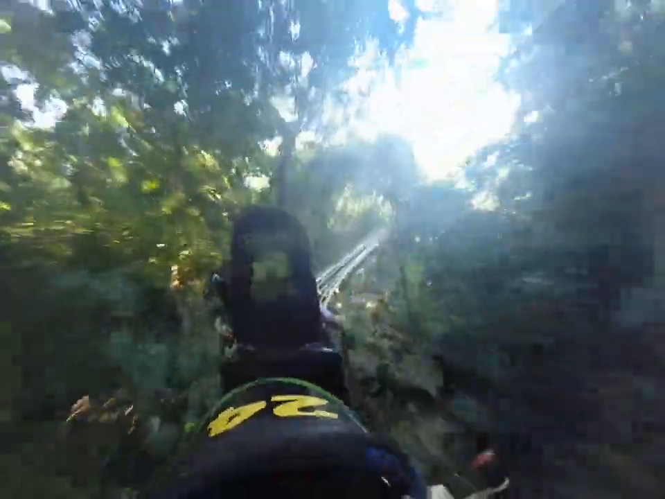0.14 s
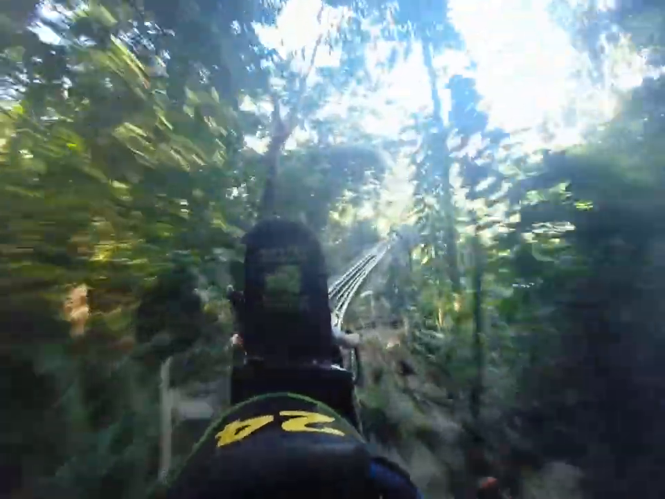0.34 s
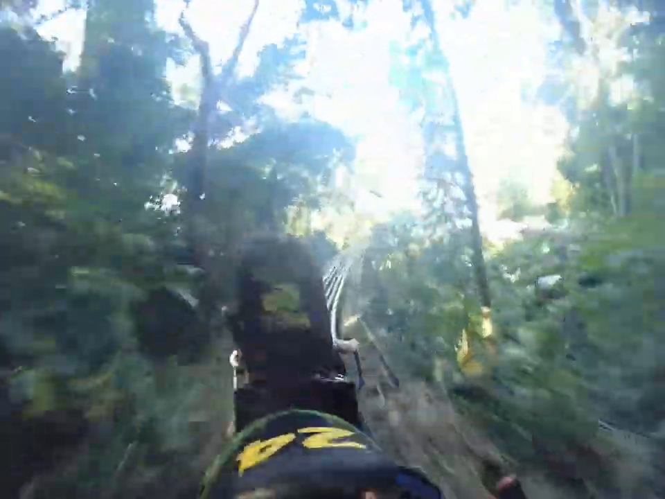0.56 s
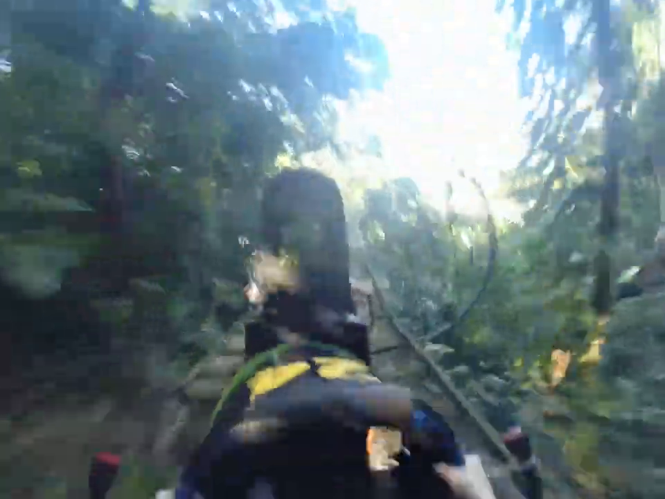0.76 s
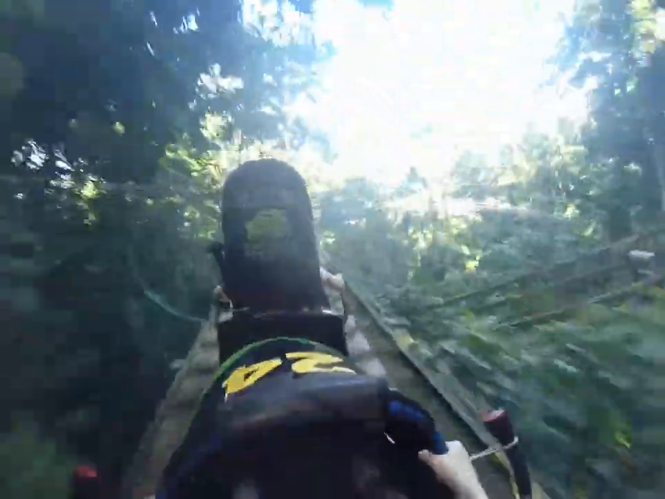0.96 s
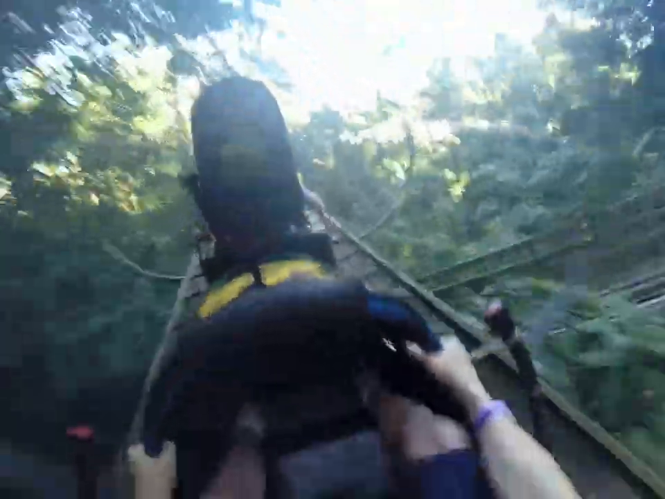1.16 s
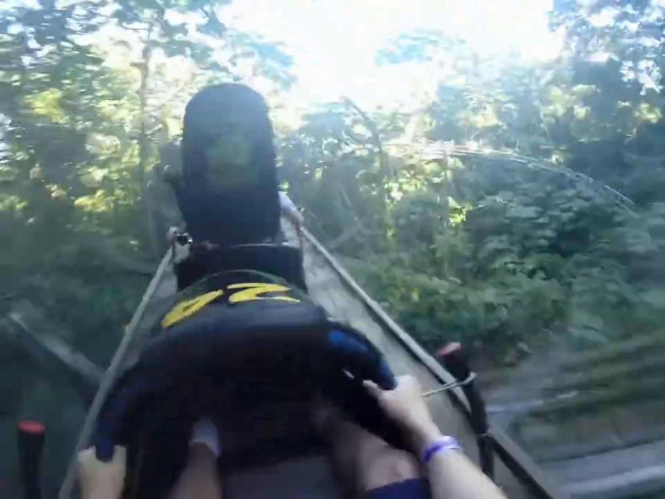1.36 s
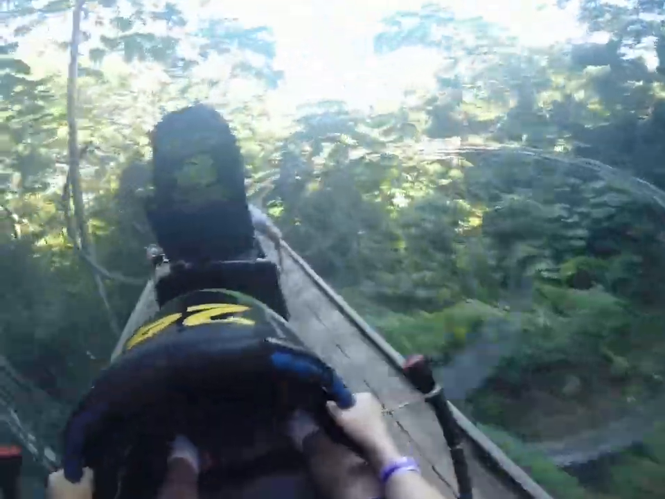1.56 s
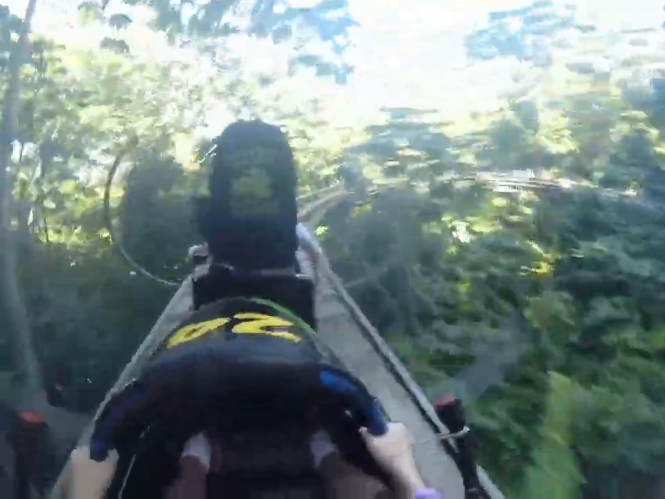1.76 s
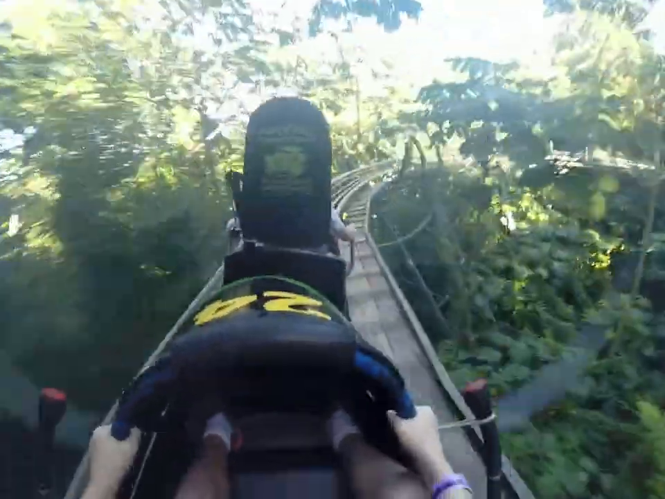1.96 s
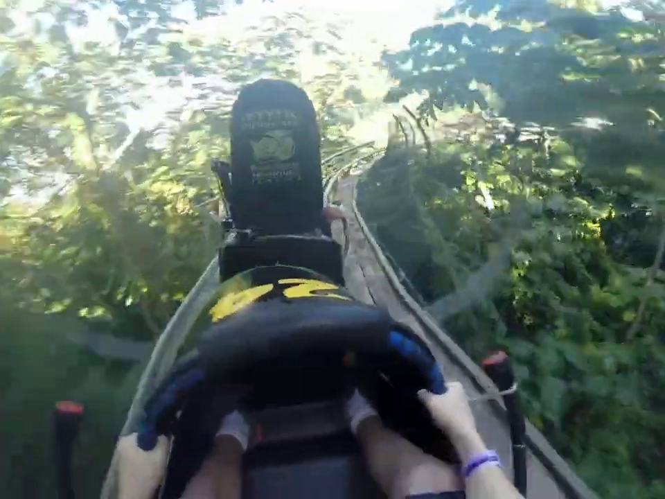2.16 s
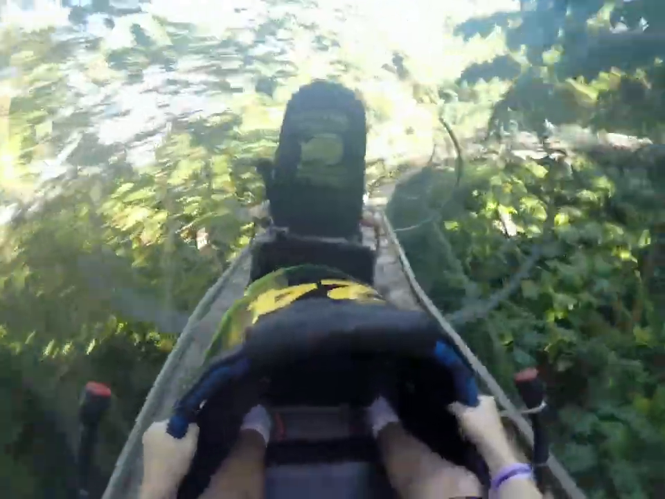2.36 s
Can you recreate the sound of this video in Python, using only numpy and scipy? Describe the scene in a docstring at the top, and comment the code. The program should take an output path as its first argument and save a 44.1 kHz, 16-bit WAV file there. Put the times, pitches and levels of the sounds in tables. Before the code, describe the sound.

A ride car runs fast down steel rails, heard close through a small camera's closed housing. A very deep, uneven shudder dominates, with heavy bounces near 0.2, 0.8 and 1.3 seconds and a weaker one at 2.2. Soft gritty wheel roar and quiet hiss continue beneath. Short dry rattles scatter throughout, sharpest near 1.57. A faint thin squeak comes around 0.45; soft bright puffs follow after 1.65.

```python
"""A deep, uneven shudder throughout, with heavy bounces of the frame: a ride car rolls fast down steel rails.
The microphone is on board, in a small camera's closed housing: sine waves and noise shake the frame.
Wheels roar softly as gritty noise; loose parts at rail joints are clicks ringing the housing's modes.
A rubbing wheel squeaks in wobbling tones, and puffs of bright noise swish over a quiet, steady hiss."""
import sys
import numpy as np
from scipy import signal
from scipy.fft import rfft, irfft
from scipy.io import wavfile
from scipy.ndimage import uniform_filter1d

SR = 44100
rng = np.random.default_rng(int(sys.argv[2]) if len(sys.argv) > 2 else 0)


def transcribe(signal):
    """Save signal, clipped to [-1, 1], as a 16-bit WAV file at the path in sys.argv[1]."""
    frames = np.atleast_2d(signal).T
    limited = np.clip(frames, -1, 1)
    pcm = np.round(limited * 32767).astype(np.int16)
    wavfile.write(sys.argv[1], SR, pcm)


N = 106236  # samples, about 2.4 s

# shaking of the car under the microphone: t/s, shudder level/dB, drumming level/dB, rumble level/dB
FRAME_SHAKE = [(0.05, -18.5, -22, -37), (0.1, -29.5, -28, -43.5), (0.19, -9, -22, -30.5),
               (0.285, -25, -29, -32), (0.4, -23.5, -37.5, -41), (0.5, -19.5, -27.5, -27.5),
               (0.56, -17, -28, -38), (0.65, -35.5, -35.5, -37), (0.78, -18.5, -24, -31.5),
               (0.82, -18, -26, -55), (0.88, -26.5, -25, -29.5), (0.93, -26, -24, -53),
               (1.16, -19.5, -25.5, -32.5), (1.21, -19.5, -40, -39), (1.3, -16.5, -19, -34),
               (1.36, -12, -36, -35.5), (1.46, -20.5, -38, -40.5), (1.5, -15.5, -25.5, -58),
               (1.56, -34.5, -31, -34.5), (1.66, -17.5, -25.5, -30), (1.76, -23, -39, -47),
               (1.85, -25, -22.5, -33.5), (1.88, -22.5, -43, -39.5), (1.999, -25, -23.5, -30),
               (2.11, -28, -32, -43.5), (2.17, -19, -26.5, -40), (2.36, -23, -37, -37)]
# the same shaking at t = 0: t/s, shudder level/dB, drumming level/dB, rumble level/dB
FRAME_SHAKE_AT_START = [(0, -20, -24, -35)]
# wide rumble of the frame, spectrum shape: f/Hz, relative density level/dB
RUMBLE_SPECTRUM = [(60, 5), (80, -6), (100, -9), (130, -11), (170, -19), (240, -18.5)]
# heavy bounces of the frame: t/s of the trough, peak level/dB, f/Hz
FRAME_BOUNCES = [(.22, -4, 26.7), (.758, -11, 41.8), (0.795, -11, 40.3), (1.285, -5, 25.5),
                 (1.372, -12.5, 34.5), (2.223, -13, 28.8)]
BOUNCE_RISE_CYCLES, BOUNCE_FALL_CYCLES = 0.677, 0.85  # Gaussian reach before and after the trough
SHUDDER_HZ, SHUDDER_WIDTH_HZ, SHUDDER_WANDER = 26.9, 14.1, 0.2116  # wander: spread as a share of f
DRUM_HZ, DRUM_WIDTH_HZ, DRUM_WANDER = 47, 20.3, 0.2


def frame():
    """Two frame modes kept ringing over wide rumble; a heavy bounce takes over the modes while it lasts."""
    t = np.arange(N) / SR
    shake = FRAME_SHAKE_AT_START + FRAME_SHAKE
    deep = shudder(SHUDDER_HZ, SHUDDER_WIDTH_HZ, SHUDDER_WANDER, rough=0.62) * curve(shake, axis=1)
    drum = shudder(DRUM_HZ, DRUM_WIDTH_HZ, DRUM_WANDER, rough=1.01) * curve(shake, axis=2)
    rumble = coloured(RUMBLE_SPECTRUM, flicker_db=0.42) * curve(shake, axis=3)
    calm, bounce = 1, 0
    for at, db, hz in FRAME_BOUNCES:
        since = t - at
        reach_cycles = np.where(since < 0, BOUNCE_RISE_CYCLES, BOUNCE_FALL_CYCLES)
        env = np.exp(-(since * hz / reach_cycles) ** 2)
        calm = calm * (1 - np.sqrt(env))
        bounce = bounce - undb(db) * env * np.cos(2 * np.pi * hz * since)
    return (deep + drum) * calm + bounce + rumble


def shudder(hz, width_hz, wander, rough):
    """A frame mode kept ringing: a wandering tone blurred by noise."""
    wandering_hz = hz * (1 + wander * walk(22))
    tone = np.sqrt(2) * np.sin(2 * np.pi * np.cumsum(wandering_hz) / SR)
    blur = band(band(rng.standard_normal(N), hz, width_hz), hz, 2 * width_hz)
    return unit(tone + rough * unit(blur))


# modes of the closed housing round the microphone: f/Hz, relative level/dB, decay by 60 dB t/s
HOUSING_MODES = [(1502, -0.5, 0.016), (1806, 4, 0.012), (2233, -3, 0.022), (2540, 1, 0.0065),
                 (2824, -2.5, 0.016), (3060, -4.5, 0.014), (3673, -4, 0.014), (4184, 9.5, 0.0066),
                 (4760, 1, 0.021), (5310, 2, 0.0094), (5984, -3, 0.03), (6810, -0.5, 0.013),
                 (7920, -5.5, 0.012), (9300, -3.5, 0.0034)]
# rattles on the car: start t/s, peak level/dB, centre f/Hz, width f/Hz,
# treble level/dB against the peak, low knock peak level/dB, length t/s
RATTLE_EVENTS = [(0.064, -46.5, 1500, 496, 6.5, -49, 0.006), (0.113, -39, 2300, 2500, -7.5, -35.5, 0.0053),
                 (0.131, -38, 1880, 1990, -25, -62, 0.018), (0.171, -34, 2330, 1200, -17, -55, 0.0091),
                 (0.257, -29.5, 3400, 1230, -6.5, -55, 0.0062), (0.268, -37, 2380, 2500, 1, -37, 0.019),
                 (.461, -35.5, 2700, 600, -25, -60, 0.0046), (0.47, -33.5, 2020, 1790, -18, -42, 0.028),
                 (0.52, -34, 2190, 2000, -22, -39, 0.0039), (0.56, -35.5, 2180, 500, -24, -49, 0.0063),
                 (0.58, -39, 1480, 400, -20, -61, 0.011), (0.625, -36, 2320, 1200, -22, -43.5, 0.011),
                 (0.651, -40.5, 1900, 2000, -24, -48, 0.016), (0.732, -35, 2380, 2200, -15, -36, 0.0078),
                 (.833, -32.5, 2000, 1400, -29, -36.5, 0.0044), (0.848, -32.5, 1910, 2000, -18, -63, 0.015),
                 (0.971, -30.5, 1890, 2560, -20, -35.5, 0.009), (1.01, -44.5, 2820, 400, -25, -62, 0.011),
                 (1.09, -34.5, 2560, 900, -13, -41, 0.0077), (1.105, -36.5, 2140, 1500, -22, -36, 0.023),
                 (1.143, -31, 2760, 1500, -15, -69, 0.0018), (1.157, -48.5, 3000, 2000, 12.5, -50, .003),
                 (1.278, -35.5, 2180, 2400, 1, -30.5, 0.0066), (1.35, -27.5, 2500, 1500, -12.5, -55, 0.013),
                 (1.381, -51, 3300, 1500, 11, -58, 0.012), (1.455, -38, 2450, 900, -23, -46, 0.019),
                 (1.554, -31, 2800, 1800, -19, -48, 0.013), (1.571, -20.5, 2800, 2040, -14.5, -53, 0.0089),
                 (1.585, -28, 2680, 1500, -15, -65, 0.0089), (1.596, -30, 1870, 1500, -30, -49, 0.01),
                 (1.656, -41, 2900, 2000, -8, -47, 0.044), (1.803, -43.5, 2880, 700, -3, -62, 0.018),
                 (1.86, -34.5, 2750, 605, -26, -55, 0.0037), (1.877, -39, 2820, 500, -25, -57, 0.0044),
                 (1.901, -41, 1690, 1200, -3, -60, 0.0069), (2.007, -35.5, 2610, 1000, -14, -55, 0.0075),
                 (2.02, -33, 1920, 1200, -10, -36.5, 0.018), (2.195, -40, 1740, 1500, -22, -38, 0.0088),
                 (2.25, -49, 2600, 1210, -19, -60.5, 0.012)]
RATTLE_CLICKS_PER_S, RATTLE_SCATTER_DB = 3200, 4.5
RATTLE_RISE_S, RATTLE_TAIL = 0.005, 0.74  # tail: decay time as a share of the length
KNOCK_HZ, KNOCK_WIDTH_HZ = 510, 293
TREBLE_FROM_HZ, CONTACT_HZ = 3800, 9000  # split of the modes; low-pass corner of a soft contact
SMALL_PER_S, SMALL_DB, SMALL_SCATTER_DB = 80, -57, 1.5  # small clicks throughout


def rattles():
    """Each rattle is a dense volley of clicks that rings the housing, with a dull knock under it."""
    out, size = np.zeros(N + SR), SR // 5
    t = np.arange(size) / SR
    mids = [mode for mode in HOUSING_MODES if mode[0] < TREBLE_FROM_HZ]
    highs = [mode for mode in HOUSING_MODES if mode[0] >= TREBLE_FROM_HZ]
    soft = signal.butter(2, CONTACT_HZ, fs=SR, output="sos")
    for at, db, hz, width_hz, treble_db, knock_db, length in RATTLE_EVENTS:
        length = max(length, .002)
        decay = np.exp(-np.maximum(t - length, 0) / (RATTLE_TAIL * length))
        env = decay * np.minimum(t / RATTLE_RISE_S, 1)
        chance, side = rng.random((size, 2)).T
        clicks = (chance < RATTLE_CLICKS_PER_S / SR) * np.sign(side - .5) * env
        clicks = clicks * undb(RATTLE_SCATTER_DB * rng.standard_normal(size))
        clicks[int(RATTLE_RISE_S * SR)] = 1  # one sure click at the end of the rise
        clicks = signal.sosfilt(soft, clicks)
        body = peak_one(band(band(ring(clicks, mids), hz, width_hz), hz, 2 * width_hz))
        treble = undb(treble_db) * peak_one(ring(clicks, highs))
        thud = env * rng.standard_normal(size)
        knock = peak_one(band(band(thud, KNOCK_HZ, KNOCK_WIDTH_HZ), KNOCK_HZ, KNOCK_WIDTH_HZ))
        i = int(at * SR)
        out[i:i + size] += undb(db) * (body + treble) + undb(knock_db) * knock
    small_levels = undb(SMALL_DB + SMALL_SCATTER_DB * rng.standard_normal(N))
    small = (rng.random(N) < SMALL_PER_S / SR) * small_levels
    return out[:N] + ring(signal.sosfilt(soft, small), HOUSING_MODES)


# roar of the wheels below the microphone: t/s, low roar level/dB, mid roar level/dB
WHEEL_ROLL = [(0.08, -45.5, -50), (0.16, -41.5, -48), (0.26, -48, -54.5), (0.29, -37, -44.5),
              (0.31, -46.5, -58.5), (0.38, -51.5, -56.5), (0.47, -43.5, -47.5), (0.64, -44, -50),
              (0.65, -43, -48.5), (0.99, -43.5, -52), (1.04, -49.5, -54.5), (1.18, -39.5, -49),
              (1.23, -49.5, -52.5), (1.285, -40.5, -46.5), (1.44, -48, -52), (1.56, -42.5, -50.5),
              (1.61, -38, -47.5), (1.77, -49, -55), (1.85, -42, -48.5), (2.04, -42, -49.5),
              (2.36, -46.5, -50.5)]
# the same roar at t = 0: t/s, low roar level/dB, mid roar level/dB
WHEEL_ROLL_AT_START = [(0, -44, -50)]
# spectrum shapes of the low roar, the mid roar and the hiss: f/Hz, relative density level/dB
LOW_ROAR_SPECTRUM = [(76, -55), (130, -1.5), (422, -11.5), (507, -11), (550, -16.5), (591, -13.5),
                     (1290, -22.5), (1500, -20), (1950, -23.5), (3300, -120)]
MID_ROAR_SPECTRUM = [(600, -5.5), (900, -3.5), (1340, -0.5), (1770, -5), (2240, 1), (2800, -3),
                     (3330, -8.5), (3800, -14.5)]
HISS_SPECTRUM = [(3000, -16), (3700, -8), (4200, 0), (4500, -2), (4760, -1), (5000, -8), (5700, -7),
                 (6800, -10), (7700, -18), (9500, -18), (12700, -24), (15000, -37)]
HISS_DB, ROAR_FLICKER_DB = -57, 1
GRAIN_DB, GRAIN_PER_S = 2.5, 100  # fast level grit of the roar


def wheels():
    """Gritty low and mid roar of wheels on steel over a steady hiss."""
    roll = WHEEL_ROLL_AT_START + WHEEL_ROLL
    low = coloured(LOW_ROAR_SPECTRUM, ROAR_FLICKER_DB) * curve(roll, axis=1)
    mid = coloured(MID_ROAR_SPECTRUM, ROAR_FLICKER_DB) * curve(roll, axis=2)
    grit = undb(GRAIN_DB * walk(GRAIN_PER_S))
    hiss = coloured(HISS_SPECTRUM, flicker_db=1.1) * undb(HISS_DB)
    return (low + mid) * grit + hiss


# puffs of treble at the microphone: t/s of the middle, length t/s, level/dB
SWISH_EVENTS = [(0.605, 0.044, -60), (1.672, 0.043, -54), (1.983, 0.06, -51), (2.122, 0.058, -48),
                (2.312, 0.05, -51)]
# spectrum shape of a puff: f/Hz, relative density level/dB
SWISH_SPECTRUM = [(3000, -12), (4500, 0), (5200, -8), (6800, -5), (8000, -17), (10000, -16), (14500, -30)]


def swishes():
    """Soft bright puffs: coloured noise under Gaussian swells."""
    t, swell = np.arange(N) / SR, 0
    for at, length, db in SWISH_EVENTS:
        swell = swell + undb(db) * np.exp(-(2 * (t - at) / length) ** 2)
    return coloured(SWISH_SPECTRUM, flicker_db=0.91) * swell


# squeaks of a wheel: start t/s, length t/s, start f/Hz, end f/Hz, level/dB at the middle
SQUEAK_EVENTS = [(0.438, 0.068, 5500, 6000, -56.5), (0.51, 0.051, 6150, 6050, -66),
                 (0.35, .047, 5550, 5200, -69)]
SQUEAK_WOBBLE, SQUEAK_ROUGH_DB = .016, 4  # spread of pitch as a share of f, spread of level


def squeaks():
    """Thin gliding tones of a rubbing wheel, wobbling in pitch and level."""
    t, out = np.arange(N) / SR, 0
    for at, length, start_hz, end_hz, db in SQUEAK_EVENTS:
        progress = np.clip((t - at) / length, 0, 1)
        hz = (start_hz + (end_hz - start_hz) * progress) * (1 + SQUEAK_WOBBLE * walk(400))
        level = undb(db + SQUEAK_ROUGH_DB * walk(201))
        arch = np.sqrt(2 * np.sin(np.pi * progress))
        out = out + level * arch * np.sin(2 * np.pi * np.cumsum(hz) / SR)
    return out


def undb(db):
    """Amplitude factor of a level in dB."""
    return 10 ** (np.asarray(db) / 20)


def unit(x):
    """Scale to an RMS of 1."""
    return x / np.sqrt(np.mean(x ** 2))


def peak_one(x):
    """Scale to a peak of 1."""
    return x / np.abs(x).max()


def curve(table, axis):
    """Gain over time from one dB column."""
    rows = np.array(table)
    return undb(np.interp(np.arange(N) / SR, rows[:, 0], rows[:, axis]))


def walk(rate):
    """Random levels held 1 / rate s and slewed twice; spread 1."""
    hold = int(SR / rate)
    steps = np.repeat(rng.standard_normal(N // hold + 1), hold)
    slewed = uniform_filter1d(uniform_filter1d(steps, hold), hold)[:N]
    return slewed / slewed.std()


FLICKER_PER_S = 20


def coloured(table, flicker_db):
    """Noise of RMS 1 with the given spectrum; each band of about half an octave flickers alone."""
    hz, db = np.array(table, float).T
    f = np.arange(N // 2 + 1) * SR / N + 1e-3  # the offset keeps log(f) finite
    spec = rfft(rng.standard_normal(N)) * undb(np.interp(np.log(f), np.log(hz), db))
    edges = np.geomspace(hz[0], hz[-1], num=int(2 * np.log2(hz[-1] / hz[0])) + 2)
    out = np.zeros(N)
    for low, high in zip(edges[:-1], edges[1:]):
        part = irfft(spec * ((f >= low) & (f < high)), N)
        out += part * undb(flicker_db * walk(FLICKER_PER_S))
    return unit(out)


def band(x, hz, width_hz):
    """Resonant band-pass, gain 1 at the centre."""
    return signal.lfilter(*signal.iirpeak(hz, hz / width_hz, fs=SR), x)


def ring(x, modes):
    """Modes of a struck body: decaying sines, with alternating signs."""
    out = np.zeros(len(x))
    for k, (hz, db, t60) in enumerate(modes):
        decay = np.log(1000) / (max(t60, 1e-3) * SR)
        pole = np.exp(2j * np.pi * hz / SR - decay)
        out += (-1) ** k * undb(db) * signal.lfilter([1], [1, -pole], x).imag
    return out


def scene():
    """All sources on the car summed to one channel."""
    return (frame() + rattles() + wheels() + swishes() + squeaks())[None, :]


TOP_HZ = 15200


def record(dry):
    """The camera cuts the top with a steep low-pass."""
    return signal.sosfilt(signal.ellip(8, .2, 70, TOP_HZ, fs=SR, output="sos"), dry)


dry = scene()
out = record(dry)
transcribe(out)
```